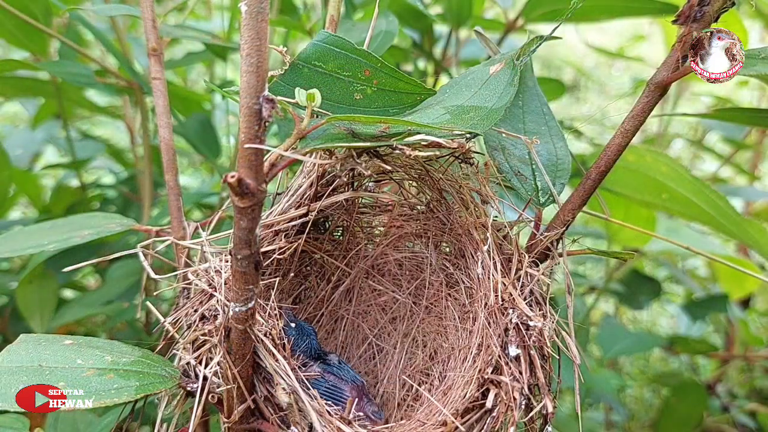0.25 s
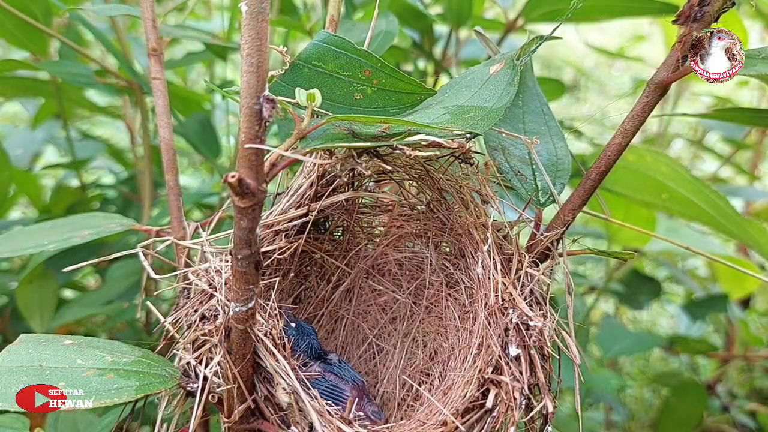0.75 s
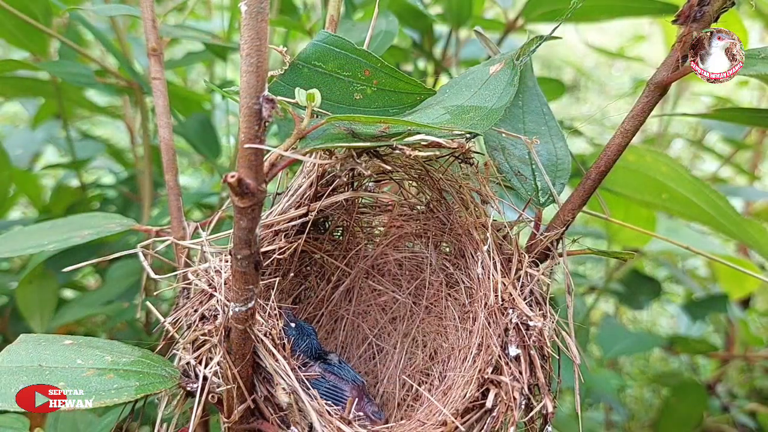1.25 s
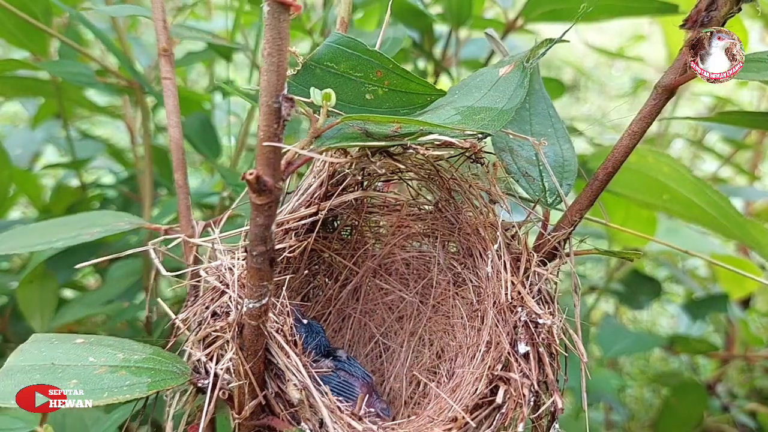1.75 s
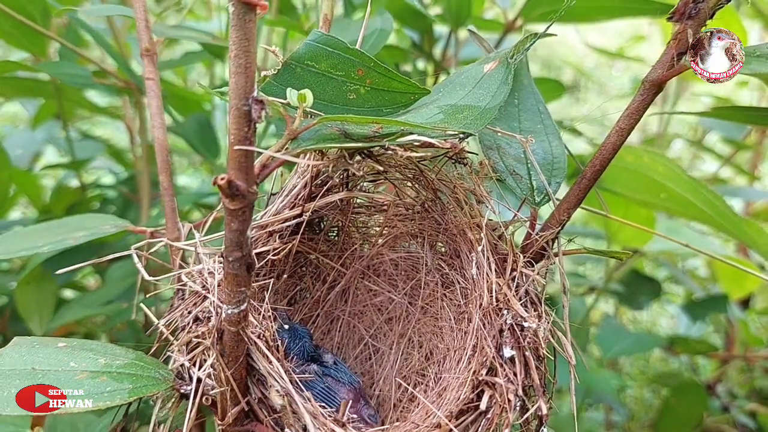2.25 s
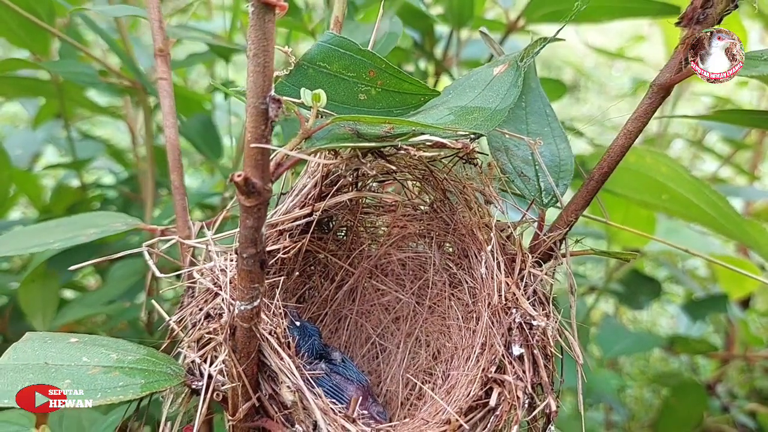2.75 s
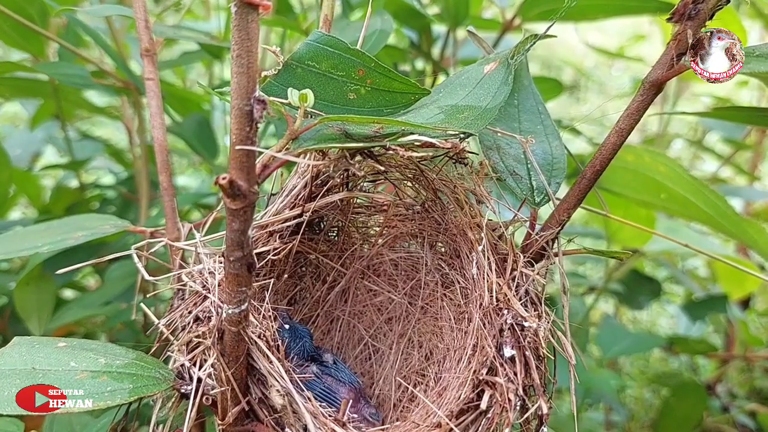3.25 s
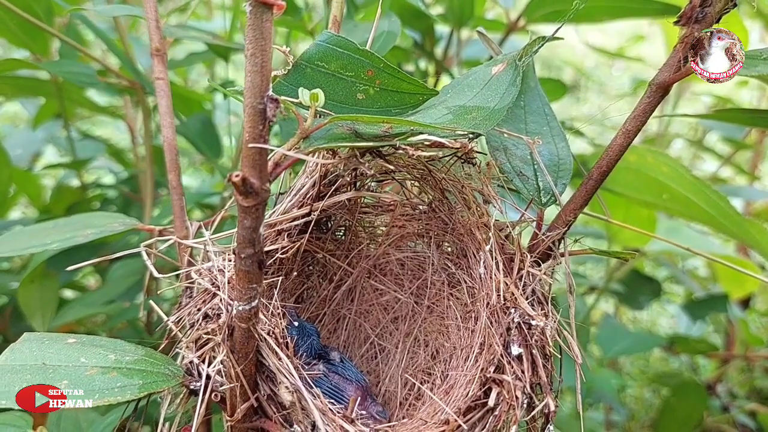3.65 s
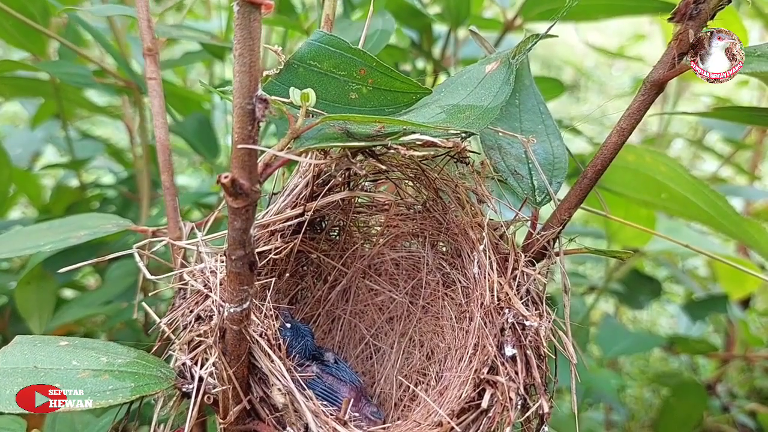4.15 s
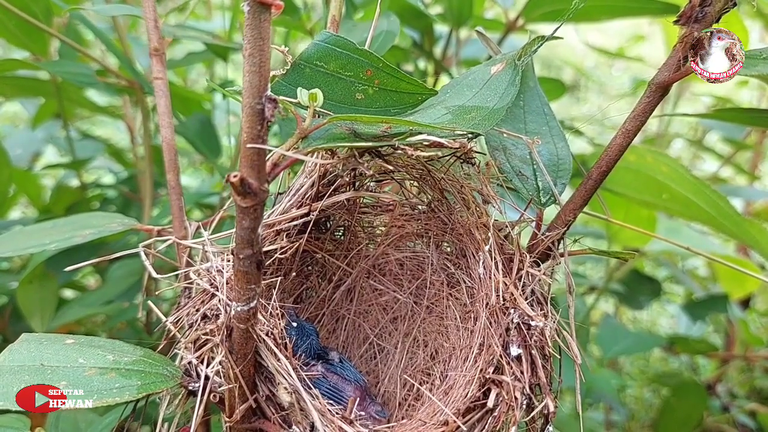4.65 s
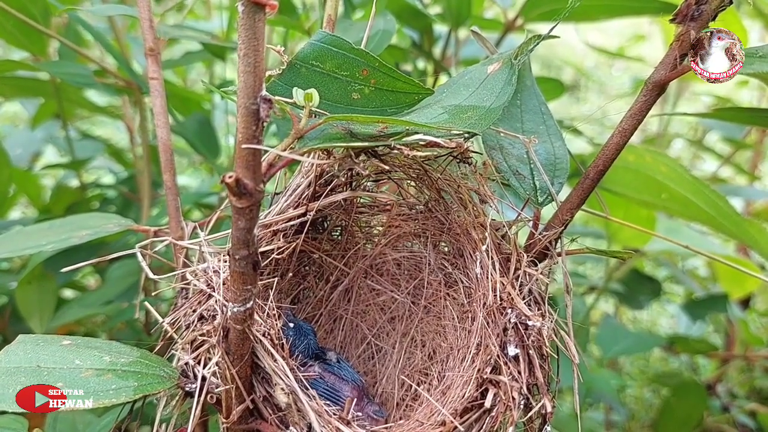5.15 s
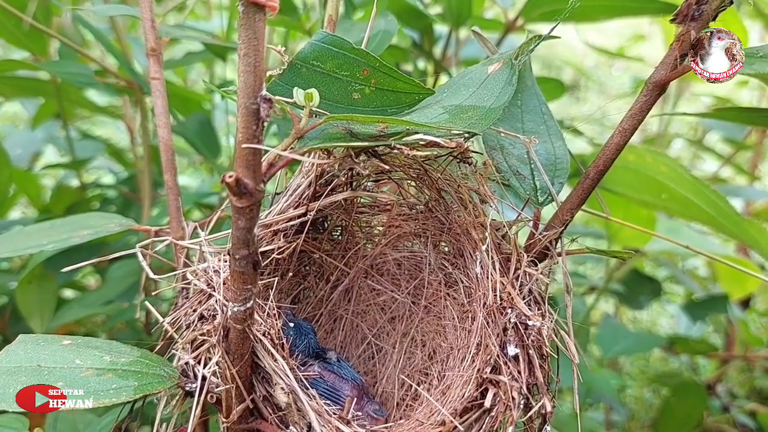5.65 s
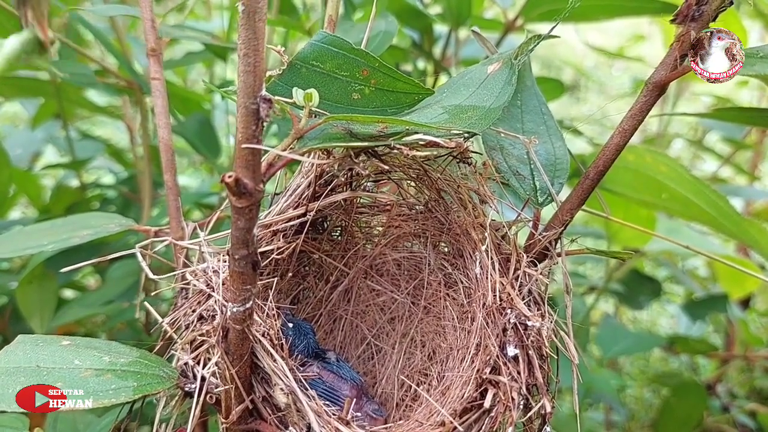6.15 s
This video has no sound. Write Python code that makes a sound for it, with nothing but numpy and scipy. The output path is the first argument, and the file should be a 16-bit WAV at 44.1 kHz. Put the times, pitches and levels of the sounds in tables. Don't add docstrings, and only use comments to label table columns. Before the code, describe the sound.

Crickets rasp and shimmer in a warm hedge while a small bird flutters off with a heavy thump, then doves coo short even notes.

```python
import sys
import numpy as np
from scipy import signal
from scipy.fft import rfft, irfft
from scipy.io import wavfile
from scipy.ndimage import uniform_filter1d

SR = 44100
rng = np.random.default_rng(int(sys.argv[2]) if len(sys.argv) > 2 else 0)


def volts_from_decibels(level):
    exponent = np.asarray(level, float) / 20
    return 10 ** exponent


def put_to_file(sound):
    columns = np.atleast_2d(sound).T
    safe = np.clip(columns, -1, 1)
    whole_steps = np.round(safe * 32767)
    wavfile.write(sys.argv[1], SR, whole_steps.astype(np.int16))


N = 281799


def tick_s():
    return np.arange(N) / SR


def rms_one(x):
    return x / np.sqrt(np.mean(x ** 2) + 1e-20)


def in_time(rows):
    s, *columns = np.transpose(rows)
    return [np.interp(tick_s(), s, c) for c in columns]


def evenly(first, last, gap):
    return np.linspace(first, last, round((last - first) / gap) + 1)


def coloured(points):
    hz, db = np.transpose(points)
    grid_hz = np.arange(N // 2 + 1) * SR / N + 1
    shape = volts_from_decibels(np.interp(np.log(grid_hz), np.log(hz), db))
    return rms_one(irfft(rfft(rng.standard_normal(N)) * shape, N))


def filtered(x, order, hz, kind="low"):
    return signal.sosfilt(signal.butter(order, hz, kind, fs=SR, output="sos"), x)


def resonate(x, hz, width_hz):
    r = np.exp(-np.pi * width_hz / SR)
    b = [(1 - r * r) / 2, 0, (r * r - 1) / 2]
    a = [1, -2 * r * np.cos(2 * np.pi * hz / SR), r * r]
    return signal.lfilter(b, a, signal.lfilter(b, a, x + 1e-18))


def trees(x, t60_s, wet_db):
    t = np.arange(SR) / SR
    tail = rng.standard_normal(SR) * volts_from_decibels(-60 * t / t60_s) * np.minimum(t / 0.018, 1)
    tail = tail / np.sqrt(np.sum(tail ** 2))
    return x + volts_from_decibels(wet_db) * signal.fftconvolve(x, tail)[:N]


def cricket(wings, strokes_per_s, phrases, start_s, crowd, uneven_db):
    picks = rng.integers(0, len(phrases), 400)
    strokes = np.concatenate([phrases[k] for k in picks])
    at = ((start_s + np.arange(len(strokes)) / strokes_per_s) * SR).astype(int)
    strokes, at = strokes[at < N], at[at < N]
    out = 0
    for hz, width_hz, db in wings:
        clicks = np.zeros(N)
        jittered = np.clip(at + rng.integers(-20, 1, len(at)), 0, N - 1)
        clicks[jittered] = strokes * volts_from_decibels(uneven_db * rng.standard_normal(len(at)))
        drive = np.sqrt(1 - crowd) * rms_one(clicks) + np.sqrt(crowd) * rng.standard_normal(N)
        out = out + volts_from_decibels(db) * resonate(drive, hz, width_hz)
    return rms_one(out)


# start in seconds [s], loudest [s], end [s], level at the top [dB], at the end [dB].
TRILL_BOUTS_S_DB = [
    (-3, 2.2, 3.33, 10, 1),
    (4, 5.7, 5.8, 9, 3),
]
TRILL_START_DB, TRILL_REST_DB = -3.5, -34


def trill_effort():
    rows = []
    for s, top_s, end_s, top_db, end_db in TRILL_BOUTS_S_DB:
        rows += [(s, TRILL_START_DB), (top_s, top_db), (end_s, end_db), (end_s + 0.028, TRILL_REST_DB)]
    return in_time(rows)[0]


# frequency [Hz], width [Hz], level [dB].
LOW_WINGS = [(4100, 760, -7), (4361, 220, 1), (4630, 200, -1), (4810, 243, -1)]
SOLO_WINGS = [(4358, 170, 0.5), (4525, 220, -7)]
LOW_OVERTONE = [(12950, 320, 4), (15000, 350, -7), (15270, 350, 1.5)]
MID_WINGS = [(6524, 150, 0.088), (6797, 260, 2)]
HIGH_WINGS = [(7680, 600, -6), (7812, 190, 0), (8170, 180, -9.5), (8156, 196, -7)]
SLOW_WINGS = [(8530, 500, -0.5), (9030, 180, -3.5)]
TRILL_WINGS = [(2079, 110, -2), (2315, 130, -9.5)]
FAR_WINGS = [(10800, 650, -3), (11030, 500, -8.5), (11324, 440, -3)]
# time [s], effort [dB], crowd share [0-1].
LOW_SINGER = [
    (0, -1, 1),
    (.8, 0, 1),
    (1.4, 1, 0.6),
    (2.1, 1.5, .55),
    (3, 1.5, .7),
    (3.4, -2, .95),
    (4.4, 2.5, 0.86),
    (5, 0, .95),
    (5.6, 0.7, 0.96),
    (6.39, 0.9, 0.5),
]
OVERTONE_DB, OVERTONE_SOLO_DB = -24.5, 1.5
# time [s], effort [dB].
SLOW_SINGER = [
    (0, -22),
    (.32, 4),
    (.66, 2),
    (.72, -10),
    (1.5, -22),
    (3, -5.5),
    (4.2, -1),
    (6.39, 0),
]


def chorus():
    low_db, crowd = in_time(LOW_SINGER)
    slow_db, = in_time(SLOW_SINGER)
    overtone_db = OVERTONE_DB + OVERTONE_SOLO_DB * (1 - crowd)
    rasp = [[1, .95, .15]]
    many = cricket(LOW_WINGS, 69.6, rasp, start_s=.018, crowd=.9, uneven_db=2)
    solo = cricket(SOLO_WINGS, 69.6, rasp, start_s=.018, crowd=.05, uneven_db=1.5)
    low = np.sqrt(crowd) * many + np.sqrt(1 - crowd) * solo
    low = filtered(low, 8, 3950, "high")
    overtone = cricket(LOW_OVERTONE, 69.6, rasp, start_s=.021, crowd=.65, uneven_db=2.5)
    low = low + volts_from_decibels(overtone_db) * overtone
    phrase = [1, .3] * 10 + [0.16, 0.14, 0.13, .1, .2]
    mid = cricket(MID_WINGS, 171.7, [phrase * 6 + [.2]], start_s=.073, crowd=.35, uneven_db=3)
    short_long = [[0.676, 1, 0.22, 1.0, 0.11, .1], [0.34, 0.72, 0.7, 1.0, 0.399, .1, .1]]
    high = cricket(HIGH_WINGS, 172.9, short_long, start_s=0, crowd=0.5, uneven_db=1.5)
    swell = np.sin(np.linspace(0, np.pi, 16)) ** 2
    slow = cricket(SLOW_WINGS, 123.3, [swell], start_s=0.027, crowd=.4, uneven_db=1.5)
    trill = cricket(TRILL_WINGS, 121.5, [[1, .8, 0.77, 0.27]], start_s=0, crowd=0.34, uneven_db=1.5)
    far = cricket(FAR_WINGS, 190, [[1]], start_s=0, crowd=0.99, uneven_db=4)
    return (volts_from_decibels(low_db - 43.5) * low + volts_from_decibels(-48.0) * mid + volts_from_decibels(-44.5) * high + volts_from_decibels(slow_db - 56) * slow
            + volts_from_decibels(trill_effort() - 74.0) * trill + volts_from_decibels(-56.0) * far)


# first rasp [s], last rasp [s], lead-in level [dB], stressed level [dB].
RASP_PHRASES = [(0.115, 0.306, -48, -37.5), (0.502, 0.823, -43.5, -42), (0.986, 1.314, -44, -42),
                (1.502, 1.814, -47, -41), (1.969, 2.33, -43, -42), (2.513, 2.8195, -45, -41),
                (3.013, 3.3543, -41.5, -40.5), (3.571, 3.895, -45, -40.5), (4.1101, 4.35, -43, -39.5),
                (4.53, 4.744, -46, -39), (4.9477, 5.256, -45.5, -40.5), (5.455, 5.773, -43, -40),
                (5.975, 6.298, -47, -37.5)]
RASP_GAP_S, RASP_STROKES_PER_S = .11, 125


def bush_cricket():
    rasps = []
    for first, last, lead_db, stress_db in RASP_PHRASES:
        rasps += [(s, stress_db if s == last else lead_db) for s in evenly(first, last, RASP_GAP_S)]
    out = np.zeros(N)
    t = np.arange(200) / SR
    for (s, db), chance in zip(rasps, rng.standard_normal((len(rasps), 16))):
        strength = np.clip((db + 48) / 10, 0, 1)
        count = int(5 + 5 * strength)
        for k in range(count):
            dip = np.sin(2.2 * (k + .5) / count)
            hz = 6750 - (450 + 300 * strength) * dip + 160 * chance[k]
            stroke = np.sin(np.pi * t / t[-1]) ** 2 * np.sin(2 * np.pi * hz * t + 3 * chance[k + 1])
            arch = np.sin(np.pi * (k + 0.94) / (count + 2))
            level = volts_from_decibels(db + 2.5 + 1.1 * chance[-k]) * arch
            i = int((s - .014 + k / RASP_STROKES_PER_S) * SR)
            out[i:i + 200] += (level * stroke)[:max(N - i, 0)]
    return trees(out, t60_s=.2, wet_db=0)


# first [s], last [s], first level [dB], last level [dB].
FLUTTER = [
    (1.142, 1.175, -49, -42),
    (1.336, 1.334, -47, -45),
    (1.373, 1.488, -37, -30),
]
BEAT_S, BEAT_SLOW_HZ, BEAT_FAST_HZ, BEAT_HALF_S = .0385, 125, 510, 0.01208
# time [s], peak [dB], slowest swing [Hz], fastest swing [Hz], half length [s].
BLAST = [
    (1.638, -15.5, 60.8, 185.4, 0.021),
    (1.698, -3, 69.62, 498.5, 0.04),
    (1.726, -7, 49.4, 58.6, .03),
    (1.847, -32, 68.6, 150, .015),
]
CALM_HZ, WILD_HZ = 130, 670


def puffs():
    beats = []
    for first, last, first_db, last_db in FLUTTER:
        at = evenly(first, last, BEAT_S)
        levels_db = np.linspace(first_db, last_db, len(at))
        beats += [(s, db, BEAT_SLOW_HZ, BEAT_FAST_HZ, BEAT_HALF_S) for s, db in zip(at, levels_db)]
    return [(*row, np.clip((row[3] - CALM_HZ) / (WILD_HZ - CALM_HZ), 0, 1)) for row in beats + BLAST]


# loudest [s], build-up [dB/s], dying [dB/s], leaves [dB], feathers [dB].
BRUSHES = [
    (.36, 300, 120, -62, -70),
    (1.075, 600, 56.5, -55.5, -58),
    (1.34, 200, 91.5, -70.5, -61),
    (1.47, 104.5, 146, -50, -52.5),
    (1.61, 497.5, 194, -71, -55.5),
    (1.645, 500, 119.5, -51, -50),
    (1.69, 201.5, 200, -52, -51),
]


def brushing():
    t = tick_s()
    shapes = [volts_from_decibels(np.where(t < s, up * (t - s), down * (s - t))) for s, up, down, *_ in BRUSHES]
    return volts_from_decibels(np.array(BRUSHES)[:, 3:].T) @ shapes


# time [s], peak [dB].
TICKS = [
    (0.706, -39),
    (1.07, -42),
]
# frequency [Hz], density [dB per Hz].
RUSTLE_COLOUR = [(300, -1), (1000, -9), (2000, -6.5), (4000, -18.5), (9000, -14), (15500, -28.5)]
FEATHER_COLOUR = [(1500, -25.5), (4000, -1), (9000, -9.5), (12000, -2.5), (15500, 0)]


def wings():
    out = np.zeros(N)
    whorls = coloured([(30, -15), (100, -4.5), (300, 7.5), (600, -11), (1500, -35.5), (4000, -50), (9000, -91.5)])
    for s, db, slow_hz, fast_hz, half_s, turbulence in puffs():
        i = np.arange(int((s - 3 * half_s) * SR), int((s + 3 * half_s) * SR))
        u = (i / SR - s) / half_s
        hz = slow_hz + (fast_hz - slow_hz) / (1 + np.abs(u / .06) ** 1.7)
        swing = np.cos(2 * np.pi * np.cumsum(hz) / SR + rng.uniform(0, 2 * np.pi))
        gust = turbulence * np.exp(-np.abs(u) * half_s / 0.01) * whorls[i]
        out[i] += volts_from_decibels(db) * (np.exp(-u ** 2 * 1.8) * swing + gust)
    clicks = np.zeros(N)
    for s, db in TICKS:
        clicks[int(s * SR)] = volts_from_decibels(db + 24)
    leaves, feathers = brushing()
    flaps_db = 2 * rms_one(resonate(rng.standard_normal(N), 30, 40))
    rustle = leaves * coloured(RUSTLE_COLOUR) + feathers * volts_from_decibels(flaps_db) * coloured(FEATHER_COLOUR)
    return out + resonate(clicks, 920, 870) + rustle


THROAT_HZ, SCOOP_S, JUMP_S, MEND_S = 964, .018, 0.00954, .005
FALL_S, FALL_HZ, SAG_HZ_PER_S = .02, 131.1, 500
BREAK_HZ, BREAK_DB = 205, -12
RELEASE_S, EDGE_DB = 0.0086, -21.5


def notes(rows, glide=1):
    out = []
    for s, length, hz, db, scoop_db in rows:
        top = min(SCOOP_S + JUMP_S, length / 2)
        fall = length - min(FALL_S, length / 2.18)
        release = length - RELEASE_S
        at = np.unique([0, min(SCOOP_S, top), top, top + MEND_S, fall, release, length])
        sag_hz = SAG_HZ_PER_S * (fall - top)
        low_hz = THROAT_HZ - hz
        bend_hz = np.interp(at, [0, min(SCOOP_S, top / 1.1), top, fall, length],
                            [low_hz - 40, low_hz + 30, 0, -sag_hz, -sag_hz - FALL_HZ])
        crack_db = BREAK_DB * (glide * (hz - THROAT_HZ) > BREAK_HZ)
        corners = np.sort([0, min(SCOOP_S, top - .001), top, min(top + MEND_S, release), release, length])
        edge_db = np.interp(at, corners, [EDGE_DB + scoop_db, scoop_db, crack_db, 0, 0, EDGE_DB])
        out.append([(s + a, hz + glide * b, db + e) for a, b, e in zip(at, bend_hz, edge_db)])
    return out


def coo(notes, fade_s):
    hz, db = in_time(np.concatenate(notes))
    t = tick_s()
    sounding = sum((t >= n[0][0]) & (t <= n[-1][0]) for n in notes) > 0
    size = int(fade_s * SR)
    level = np.sqrt(2) * volts_from_decibels(db) * sounding
    for _ in range(2):
        level = uniform_filter1d(level, size, mode="nearest")
    return 2 * np.pi * np.cumsum(uniform_filter1d(hz, size)) / SR, level


def stray_paths(phase, share, spread_hz):
    settle = 4000
    drift = filtered(rng.standard_normal((2, len(phase) + settle)), 4, spread_hz)
    a, b = rms_one(drift[:, settle:])
    strays = a * np.sin(phase) + b * np.cos(phase)
    return np.sqrt(1 - share) * np.sin(phase) + np.sqrt(share / 2) * strays


def breath(level, phase, breath_db):
    shake = rms_one(resonate(rng.standard_normal(N), 165, 112))
    return level * volts_from_decibels(breath_db) * shake * np.sin(phase)


# start [s], length [s], top pitch [Hz], level [dB], opening scoop over the held part [dB].
NEAR_DOVE = [
    (3.724, .158, 1207, -35.5, 7),
    (3.876, .05, 1131, -31, 0),
    (3.94, 0.037, 1050, -30, 3.5),
    (4.012, 0.039, 1081, -31, 4),
    (4.098, 0.086, 1113, -32.5, 3.5),
    (4.284, 0.086, 1115, -36, -1),
    (6.256, 0.13, 1201, -34.5, 3.5),
    (6.3755, 0.024, 1102, -43, 5),
]
ANSWER = [
    (4.835, 0.15, 1224, -38, -13.5),
    (4.995, .045, 1089, -52.5, -5),
    (5.05, 0.031, 1051, -50, 2.5),
    (5.09, 0.037, 1112, -46.5, 0),
    (5.175, 0.096, 1155, -44, -0.5),
    (5.31, 0.111, 1113, -59.5, 1),
]
FAR_DOVE = [
    (2.375, 0.088, 1117, -45, -8),
    (2.464, 0.033, 1106, -36.5, -3),
    (2.51, 0.14, 1098, -54.5, -1),
    (2.62, 0.08, 1097, -53.5, -3),
    (2.715, 0.064, 1081, -48.5, -5),
    (2.77, 0.136, 1046, -64, 2),
    (2.9, 0.14, 1057, -63, 2),
]
# time [s], share that comes by stray paths [0-1].
FAR_STRAY = [
    (2.36, 0.25),
    (2.49, 0),
    (2.55, 0.8),
    (2.65, 0),
    (2.7, 0.8),
    (2.75, 0.05),
    (2.85, 1),
    (2.93, 0.16),
    (3.08, 0.35),
]


def doves():
    phase, level = coo(notes(NEAR_DOVE), fade_s=0.003)
    near = level * np.sin(phase) + breath(level, phase, breath_db=-24.5)
    phase, level = coo(notes(ANSWER), fade_s=0.0041)
    answer = level * stray_paths(phase, 0.14, spread_hz=21) + breath(level, phase, breath_db=-22.5)
    phase, level = coo(notes(FAR_DOVE, glide=0.13), fade_s=0.011)
    share, = in_time(FAR_STRAY)
    far = level * stray_paths(phase, share, spread_hz=73) + breath(level, phase, breath_db=-20.5)
    return (trees(near, t60_s=0.59, wet_db=-19.5) + trees(answer, t60_s=0.63, wet_db=-5)
            + trees(far, t60_s=0.53, wet_db=-11.5))


# start [s], level [dB], held pitch [Hz], length [s].
WHISTLES = [(0, -59.5, 2940, 0.094), (5.301, -61, 3070, 0.045), (4.44, -69, 3220, 0.15),
            (4.6, -76, 3170, 0.11), (0.208, -53, 2933, 0.1), (0.482, -49.5, 2950, 0.077),
            (0.774, -52, 2980, 0.1), (2.372, -58, 2900, 0.039), (2.65, -58.5, 3040, 0.062),
            (2.925, -58.5, 2960, 0.067), (3.23, -61.5, 3060, 0.081), (3.508, -56, 3010, 0.07),
            (3.69, -51.5, 3290, .07), (3.826, -52, 3040, 0.1), (5.141, -57, 3200, 0.1),
            (5.492, -53.5, 2950, 0.073), (5.762, -49.5, 2977, 0.081), (6.072, -49.5, 2960, 0.066)]
# start [s], level [dB].
TWEETS = [
    (.085, -52),
    (.325, -41),
    (.62, -42),
]


def songbirds():
    far, near = np.zeros((2, N))
    wash = resonate(rng.standard_normal(N), 3380, 1270)
    wash = rms_one(filtered(wash, 6, 2980, "high"))
    for s, db, hz, length in WHISTLES:
        t = np.arange(int(length * SR)) / SR
        i = int(s * SR)
        arch = np.sin(np.pi * t / length)
        phase = 2 * np.pi * np.cumsum(hz + 450 * np.exp(-t / .012) + 300 * t) / SR
        far[i:i + len(t)] += volts_from_decibels(db - 5) * arch ** .3 * stray_paths(phase, .5, spread_hz=90)
        far[i:i + len(t)] += volts_from_decibels(db - 6) * arch * wash[i:i + len(t)]
    t = np.arange(int(0.02 * SR)) / SR
    tweet = np.hanning(len(t)) * np.sin(2 * np.pi * (7150 * t + 14000 * t ** 2))
    for s, db in TWEETS:
        near[int(s * SR):][:len(t)] += volts_from_decibels(db + 7.5) * tweet
    return trees(far, t60_s=.4, wet_db=1.5) + near


# frequency [Hz], density [dB per Hz].
AIR = [(20, -23.5), (40, -15), (70, 1.5), (125, -4), (200, -17), (350, -29.5), (600, -37.5), (1200, -40.5),
       (2600, -41), (3600, -36.5), (5500, -27.5), (9500, -33), (13800, -42.5), (15500, -44.5)]
# time [s], level [dB].
BREEZE = [(0, -47.5), (.5, -43.5), (1.2, -48), (2.1, -44), (2.9, -44.5), (3.7, -41.5), (4.3, -44.5),
          (4.7, -48), (5.4, -47.5), (6.07, -44.5), (6.39, -47)]
WAKE_DB = 10.5


def air(gain):
    noise = coloured(AIR)
    low = signal.sosfiltfilt(signal.butter(2, 350, fs=SR, output="sos"), noise)
    patches_db = 1.2 * rms_one(resonate(rng.standard_normal(N), 2.5, 3.0))
    leaves, _ = brushing()
    rumble = gain * volts_from_decibels(in_time(BREEZE)[0]) + volts_from_decibels(WAKE_DB) * leaves
    return volts_from_decibels(2.0) * rumble * low + gain * volts_from_decibels(-43.0 + patches_db) * (noise - low)


OPEN_DB, OPENING_DB_PER_S = -0.75, 2.5
BLAST_S, CLAMP_S = 1.686, 0.051
KNOCKED_DB, HELD_DB, LET_GO_S, CREEP_DB_PER_S = -3.5, -6, 1.39, 0.95


def gain_control():
    since = np.maximum(tick_s() - BLAST_S, 0)
    before = OPEN_DB + OPENING_DB_PER_S * tick_s()
    after = KNOCKED_DB + CREEP_DB_PER_S * since + HELD_DB * np.exp(-(since / LET_GO_S) ** 4.2)
    clamped = np.minimum(since / CLAMP_S, 1)
    return (1 - clamped) * before + clamped * after


def scene():
    gain = volts_from_decibels(gain_control())
    insects = gain * (chorus() + bush_cricket())
    return (insects + wings() + doves() + songbirds() + air(gain))[None]


def roll_off(x):
    return signal.sosfilt(signal.butter(12, 15420, fs=SR, output="sos"), x)


def record(dry):
    ceiling = .72
    limited = dry / (1 + np.abs(dry / ceiling) ** 6) ** (1 / 6)
    return roll_off(limited)


dry = scene()
out = record(dry)
put_to_file(out)
```